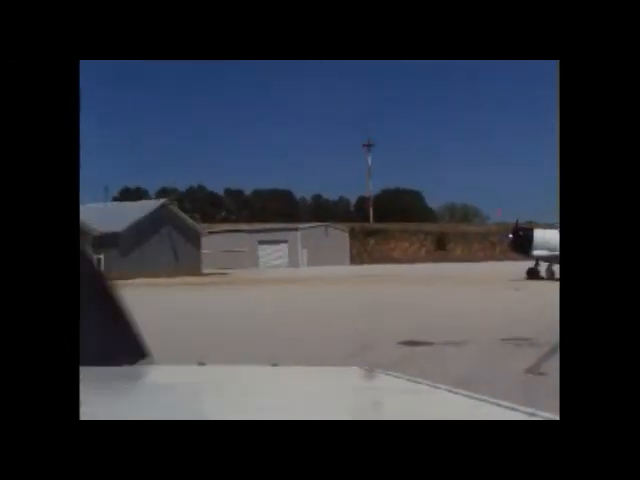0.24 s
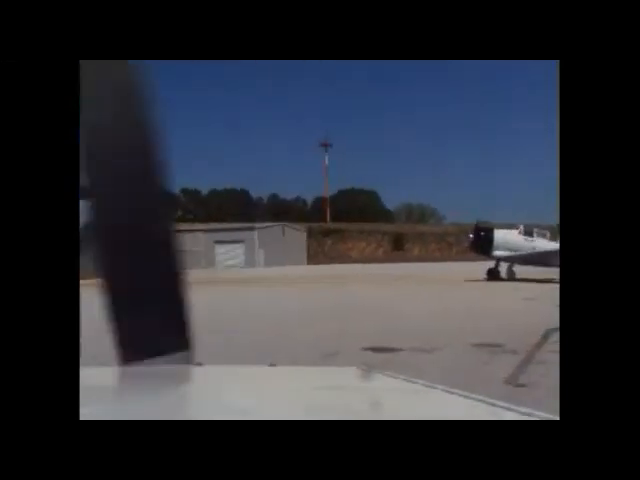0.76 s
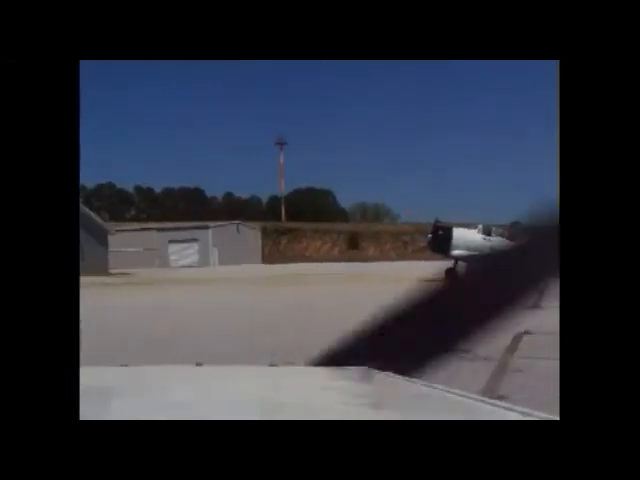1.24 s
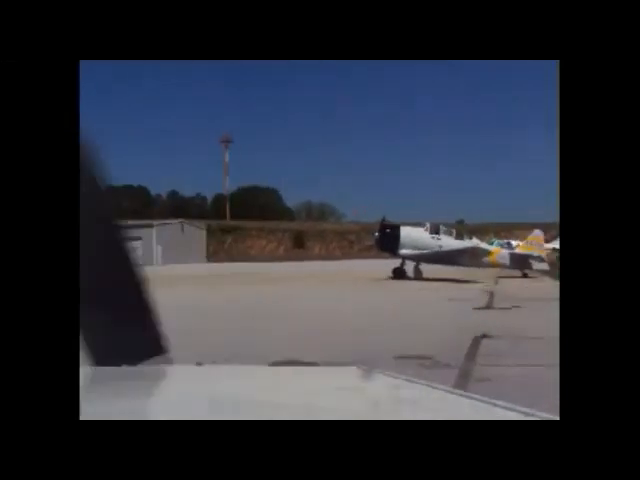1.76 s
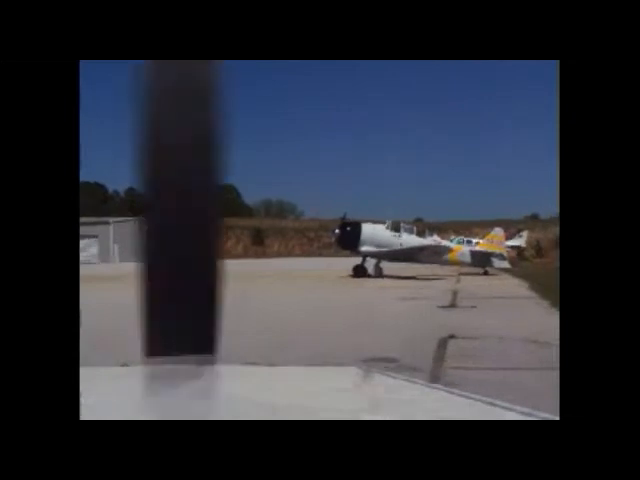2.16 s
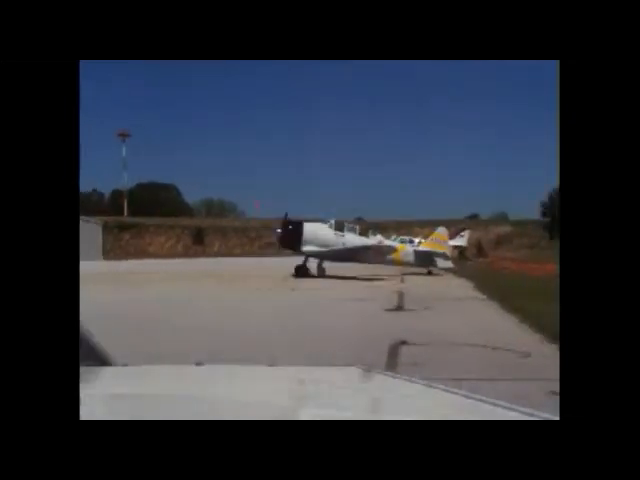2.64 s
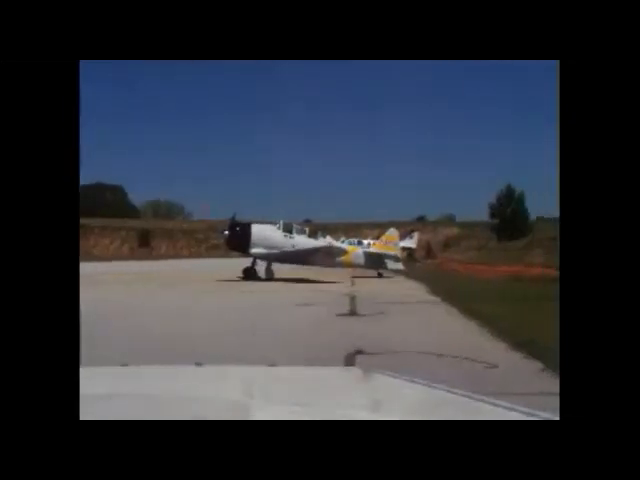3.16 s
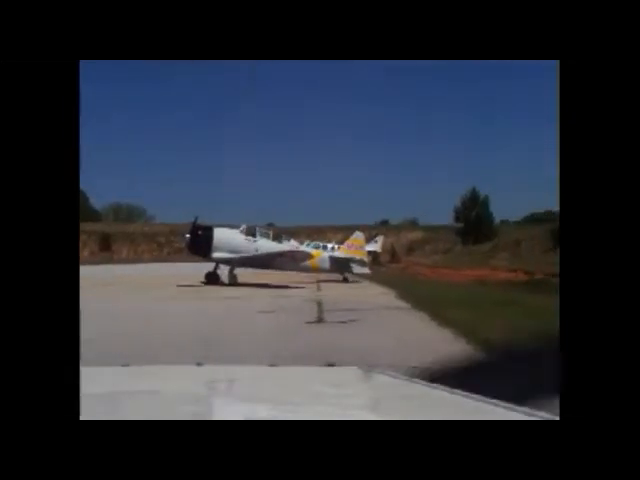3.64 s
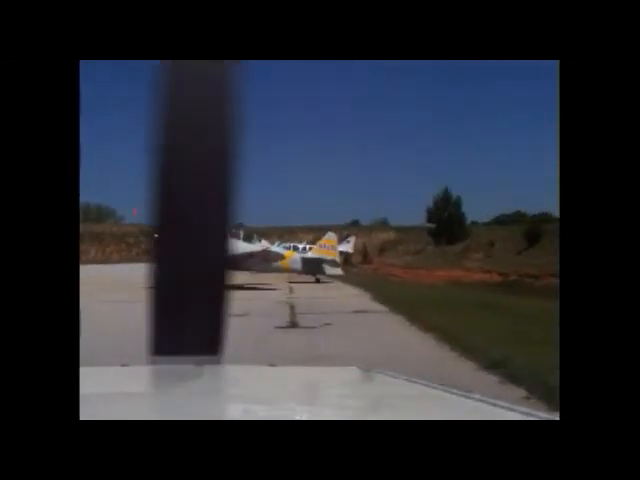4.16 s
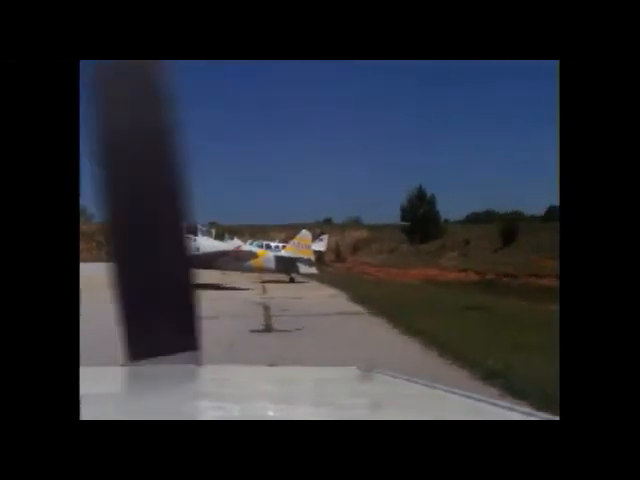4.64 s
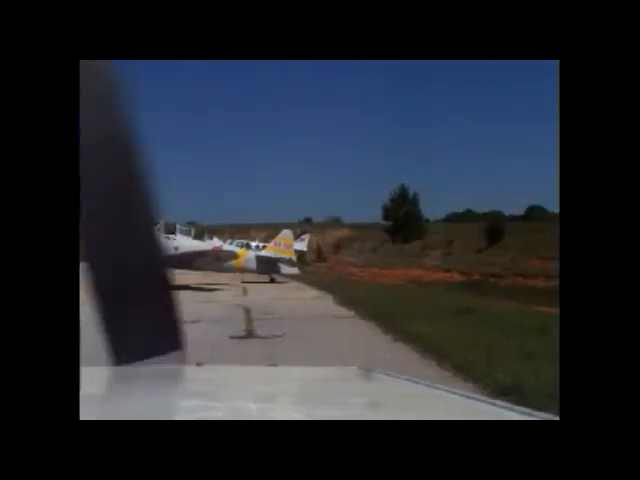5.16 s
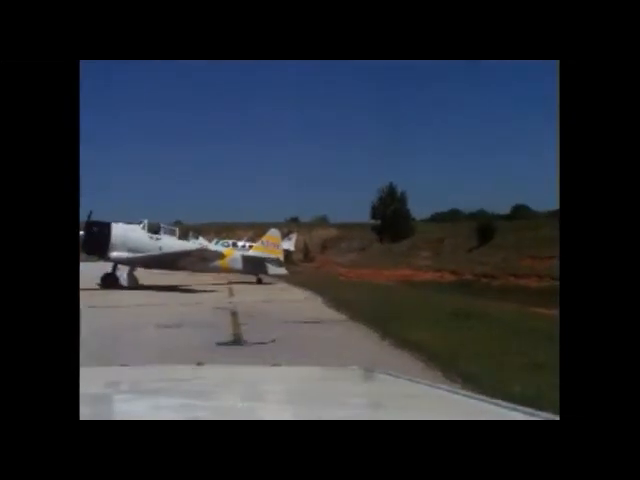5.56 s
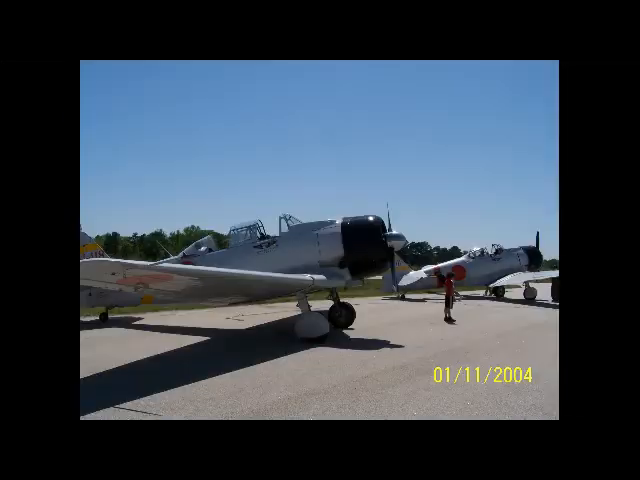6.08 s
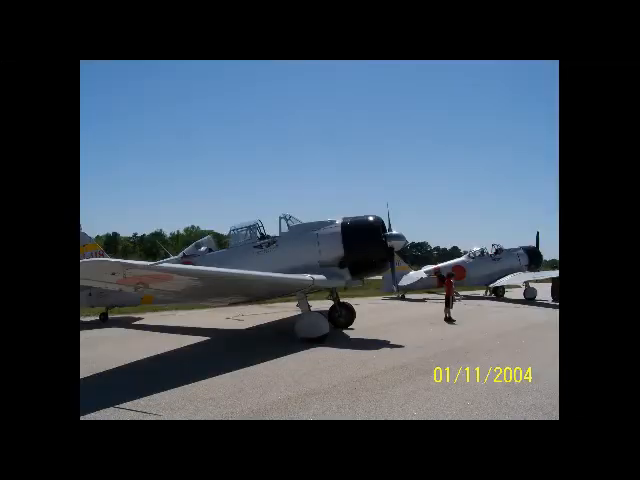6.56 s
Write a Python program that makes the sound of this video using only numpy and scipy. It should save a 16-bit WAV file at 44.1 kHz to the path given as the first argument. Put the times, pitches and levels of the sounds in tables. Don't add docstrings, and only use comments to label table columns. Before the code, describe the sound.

Close to the cowling of a small taxiing plane, a four-cylinder engine repeats a fast, lumpy pattern of hollow exhaust thumps, panel knocks, metallic ticks and bright valve clacks. A low drone and breathy propeller wash lie underneath. It speeds up slightly, settles, and runs on steadily for six seconds until the sound cuts instantly to silence. A small, dull recorder captures it, dry and mono.

```python
import sys
import numpy as np
from scipy import signal
from scipy.fft import rfft, irfft, next_fast_len
from scipy.io import wavfile
from scipy.ndimage import map_coordinates

SR = 44100
rng = np.random.default_rng(int(sys.argv[2]) if len(sys.argv) > 2 else 0)


def how_loud(loudness_db):
    steps = np.asarray(loudness_db, float) / 20
    return 10 ** steps


def store_pcm(level_fs):
    pcm = np.round(np.clip(level_fs, -1, 1) * 32767).astype(np.int16)
    wavfile.write(sys.argv[1], SR, np.atleast_2d(pcm).T)


N = 300409
SETTLE_S = 1.47673

# [position/cycle, f/Hz, peak level/dB, loss of the after-thump/dB]
FIRINGS = [
    (.092, 445, -13.5, 4.5),
    (.347, 497, -13, 7.5),
    (.565, 472, -13.5, 4.5),
    (.80, 462, -16, 1),
]
# [f/Hz, length/ms, noise share/0-1, [(position/cycle, peak level/dB)]]
PANEL_KNOCKS = [(268, 15, .1, [(.07, -25), (.46, -23), (.72, -21.5)]), (420, 9, .2, [(.975, -19.5)]),
                (658, 9, .1, [(.09, -25), (.30, -20), (.39, -21), (.52, -22), (.64, -21), (.81, -22)]),
                (935, 10, .27, [(.05, -26), (.575, -19), (.795, -24)]), (1130, 11, .35, [(.285, -21)]),
                (1220, 10, .27, [(.09, -22.5), (.60, -21.5)]), (1390, 9, .3, [(.56, -22)]),
                (1735, 18, .4, [(.60, -26)]), (1850, 6, .55, [(.225, -22), (.77, -26)]),
                (2480, 13, .6, [(.57, -24), (.77, -28)]), (2660, 10, .7, [(.49, -30), (.61, -25)]),
                (3450, 8, .5, [(.05, -28), (.49, -31)])]
# [multiple of the cycle rate/1, level/dB rms]
SHAFT_ORDERS = [(4, -39.5), (5, -34.5), (6, -49), (7, -38.5), (8, -35.5), (9, -37), (11, -33), (12, -34),
                (13, -49.5), (14, -42.5), (15, -30), (16, -36.5), (17, -32), (18, -46), (19, -33.5),
                (20, -42.5), (21, -36.5), (24, -43.5), (25, -42), (28, -33.5), (29, -43), (32, -44.5)]
# [f/Hz, peak level/dB, length/ms]
COWL_MODES = [
    (1198, -15.5, 18),
    (1255, -24, 16),
    (1198, -23, 8),
]
# [position/cycle, peak level/dB]
QUIET_VALVES = [
    (.225, -15.5),
    (.475, -18.5),
    (.72, -22),
]
# [t/s, level over the usual/dB]
ODD_CLACKS = [(.175, 2.5), (.503, -2), (.825, -3.5), (1.144, 4.5), (1.568, 1.5), (1.882, 2), (2.096, -5),
              (2.409, 5), (2.827, 3.5), (2.933, 4), (3.242, 0), (3.553, -2), (4.177, 0.5), (4.696, 1),
              (4.799, 0), (4.902, -3.5), (5.317, 1), (5.732, -3), (5.94, 1)]
# [f/Hz, width/Hz, level/dB]
COVER_MODES = [(3400, 220, -5.5), (4750, 150, -7), (5086, 30, 3.5), (5570, 110, 0.5), (6106, 140, -6),
               (6900, 150, -12.5), (7770, 250, -30.5)]
# [f/Hz, width/Hz, level/dB]
CABIN_PANELS = [(660, 21, -14.5), (935, 22, 8), (1200, 31, 6.5), (1397, 65, 1), (1530, 24, 4.5),
                (1722, 17, 8.5), (2461, 45, 11.5), (2776, 150, 6.5), (3450, 70, 0.5), (5300, 57, -2),
                (4830, 100, -9.5), (5960, 75, -17.5), (5840, 79, -2), (6770, 130, 4.5)]
# [f/Hz, level/dB per Hz]
WASH_SPECTRUM = [(15, -45), (25, -11.5), (60, -6), (158, -6.5), (321, -12), (462, 1), (823, -17),
                 (1070, -12), (1600, -18), (2160, -18), (2510, -27), (4200, -32.5), (5460, -60),
                 (9240, -120)]
# [f/Hz, level/dB per Hz]
HISS_SPECTRUM = [(1760, -26.5), (3000, -0.5), (3430, 0), (4290, -7), (5040, 1), (5720, 4), (6460, -6),
                 (7140, -5), (8210, -17), (10700, -50.5), (18100, -120)]
# [f/Hz, share/0-1]
REPEAT_SHARE = [(200, .2), (400, .15), (700, .2), (1000, .15), (1700, .2), (2600, .08), (5000, 0)]
# [f/Hz, level/dB]
BAND_EDGE = [(22, -16), (36, 1.5), (7000, 0), (8000, -4.5), (8400, -7), (8700, -33), (9000, -87.5)]
# [f/Hz, level/dB]
MIRROR_BAND = [(8800, -57.5), (9100, -17), (9600, -22), (10800, -34), (12000, -51.5), (13400, -46),
               (14300, -56), (15300, -73), (16000, -93)]


def unit(x):
    return x / np.sqrt(np.mean(x ** 2) + 1e-20)


def along(points, hz):
    f, value = np.transpose(points)
    return np.interp(np.log(hz + 1), np.log(f + 1), value)


def wobble(rate):
    knots = rng.standard_normal(int(N * rate / SR) + 4)
    return map_coordinates(knots, [np.arange(N) * rate / SR])


def bump(s, db, spread_s):
    return db * np.exp(-((np.arange(N) / SR - s) / spread_s) ** 2)


def filtered(x, response):
    m = next_fast_len(N + SR // 2)
    return irfft(rfft(x, m) * response(np.fft.rfftfreq(m, 1 / SR)), m)[:N]


def resonances(modes):
    def response(f):
        total = 0
        for k, (centre, width, db) in enumerate(modes):
            damping = 1j * f * width
            total = total + (-1) ** k * how_loud(db) * damping / (centre * centre - f * f + damping)
        return total
    return response


def ring(blows, hz, length_ms, noisy):
    shape = np.hanning(round(length_ms * SR / 1000)) ** .6
    wave = shape * np.sin(2 * np.pi * hz * np.arange(len(shape)) / SR)
    clean = signal.oaconvolve(blows, wave, "same")
    fuzz = unit(filtered(rng.standard_normal(N), resonances([(hz, 1500 / length_ms, 0)])))
    fuzz = fuzz * signal.oaconvolve(blows, shape, "same")
    return np.sqrt(1 - noisy) * clean + np.sqrt(noisy / 2) * fuzz


def cycles():
    t = np.arange(N) / SR
    start_cycle, steady_per_s, start_slower_per_s = -.62511, 9.66876, .57171
    hunt_cycles, hunt_s, hunt_latest_s = .0035, 2.7, 3.45
    lost = start_slower_per_s * SETTLE_S * (1 - np.exp(-t / SETTLE_S))
    hunt = hunt_cycles * np.cos(2 * np.pi * (t - hunt_latest_s) / hunt_s)
    return start_cycle + steady_per_s * t - lost - hunt


def moments(crank, share, jitter_ms, scatter_db):
    draw = rng.standard_normal((61, 2))
    times = np.interp(np.arange(-1, 60) + share, crank, np.arange(N) / SR, left=-1, right=9)
    times = times + jitter_ms * draw[:, 0] / 1000
    sizes = how_loud(scatter_db * draw[:, 1])
    at = np.round(times * SR).astype(int)
    inside = (at >= 0) & (at < N)
    return np.bincount(at[inside], sizes[inside], N)


def exhaust_pipes(crank):
    thump_ms, after_ms, after_cycles, after_pitch = 14, 12.5, .108, .94
    total = np.zeros(N)
    for share, hz, db, loss_db in FIRINGS:
        first = moments(crank, share, jitter_ms=.05, scatter_db=1.3)
        second = moments(crank, share + after_cycles, jitter_ms=.05, scatter_db=1.3)
        thump = ring(first, hz, thump_ms, .1)
        after = ring(second, after_pitch * hz, after_ms, .17)
        total += how_loud(db) * (thump + how_loud(-loss_db) * after)
    return how_loud(-0.07) * total


def struck_panels(crank):
    total = np.zeros(N)
    for hz, length_ms, noisy, strikes in PANEL_KNOCKS:
        blows = sum(how_loud(db) * moments(crank, share, jitter_ms=.05, scatter_db=1.3) for share, db in strikes)
        total += ring(blows, hz, length_ms, noisy)
    return how_loud(-0.72) * total


def shaft(crank):
    total = np.zeros(N)
    for multiple, db in SHAFT_ORDERS:
        level = how_loud(db + 2.0 + 1.5 * wobble(1.2))
        total += level * np.sin(2 * np.pi * (multiple * crank + rng.random()) + 0.26 * wobble(3))
    return total


def cowling(crank):
    weak_db = bump(2.38, -15, .04)
    hardest_db = bump(2.75, 2.5, .45)
    blows = how_loud(weak_db + hardest_db) * moments(crank, .778, jitter_ms=.1, scatter_db=.9)
    total = how_loud(-8) * signal.oaconvolve(blows, np.hanning(round(.0006 * SR)), "same")
    lead_ms = 2.9
    for hz, db, length_ms in COWL_MODES:
        delay = round((length_ms / 2 - lead_ms) * SR / 1000)
        late = np.pad(blows, (delay, 0))[:N]
        total = total + how_loud(db) * ring(late, hz, length_ms, .04)
    return total


def valves(crank):
    odd_db = sum(bump(s, db, .03) for s, db in ODD_CLACKS)
    seats = how_loud(-10.5 + odd_db) * moments(crank, -.03, jitter_ms=.6, scatter_db=0.3)
    for share, db in QUIET_VALVES:
        seats = seats + how_loud(db - 8) * moments(crank, share, jitter_ms=0.89, scatter_db=3.0)
    rise_ms = 1.8
    u = np.arange(int(8 * rise_ms * SR / 1000)) / SR * 1000 / rise_ms
    burst = u * np.exp(1 - u)
    rattle = signal.oaconvolve(seats, burst)[:N] * np.sign(rng.standard_normal(N))
    bare = how_loud(-25) * np.gradient(rattle)
    return how_loud(7.5) * (filtered(rattle, resonances(COVER_MODES)) + bare)


def repeating_noise(crank):
    patterns = rng.standard_normal((6, 4600))
    slow = np.arange(N) / N * 4 + .5
    return unit(map_coordinates(patterns, [slow, crank % 1 * 4599], order=1))


def wash(crank, spectrum, throb_db, panel_db):
    def colour(f):
        return how_loud(along(spectrum, f)) * (1 + how_loud(panel_db) * np.abs(resonances(CABIN_PANELS)(f)))

    throb = throb_db * np.cos(2 * np.pi * (4 * crank - .15)) + 1.0 * wobble(30) + 0.15 * wobble(4.1)
    same = filtered(repeating_noise(crank), lambda f: colour(f) * np.sqrt(along(REPEAT_SHARE, f)))
    fresh = filtered(rng.standard_normal(N), lambda f: colour(f) * np.sqrt(1 - along(REPEAT_SHARE, f)))
    return unit(how_loud(throb) * (same + fresh))


def scene():
    crank = cycles()
    labour = np.exp(-np.arange(N) / SR / SETTLE_S)
    engine = how_loud(-0.7 - 0.8 * labour) * (exhaust_pipes(crank) + struck_panels(crank))
    engine = engine + how_loud(-2 + 1.5 * labour) * shaft(crank)
    engine = engine + cowling(crank) + valves(crank)
    air = how_loud(-19.5 + 1 * labour) * wash(crank, WASH_SPECTRUM, throb_db=1.5, panel_db=0.7)
    hiss = how_loud(-32.5 + .6 * labour) * wash(crank, HISS_SPECTRUM, throb_db=0.76, panel_db=-9.5)
    return (engine + air + hiss)[None]


def roll_off(x):
    return signal.sosfilt(signal.butter(12, 15300, fs=SR, output="sos"), x)


def record(dry):
    t = np.arange(N) / SR
    sampling_hz, stop_s = 17640, 6.098
    folded = 2 * dry[0] * np.cos(2 * np.pi * sampling_hz * t)
    mirror = filtered(folded, lambda f: how_loud(along(MIRROR_BAND, f)))
    kept = filtered(dry[0], lambda f: how_loud(along(BAND_EDGE, f))) + mirror
    mix = (kept * (t < stop_s))[None]
    return roll_off(mix)


dry = scene()
out = record(dry)
store_pcm(out)
```